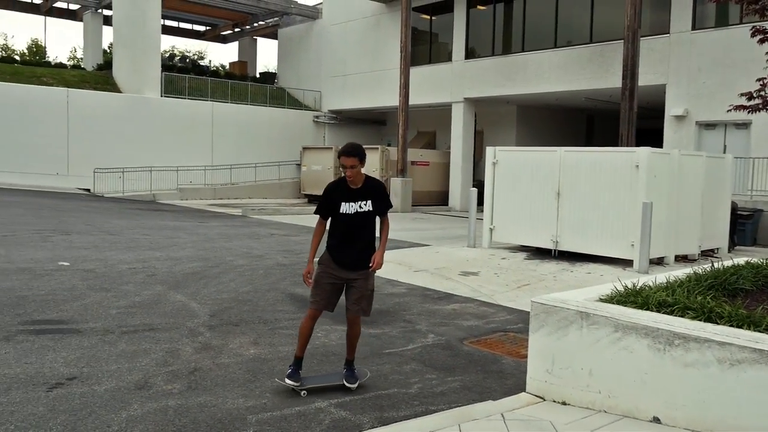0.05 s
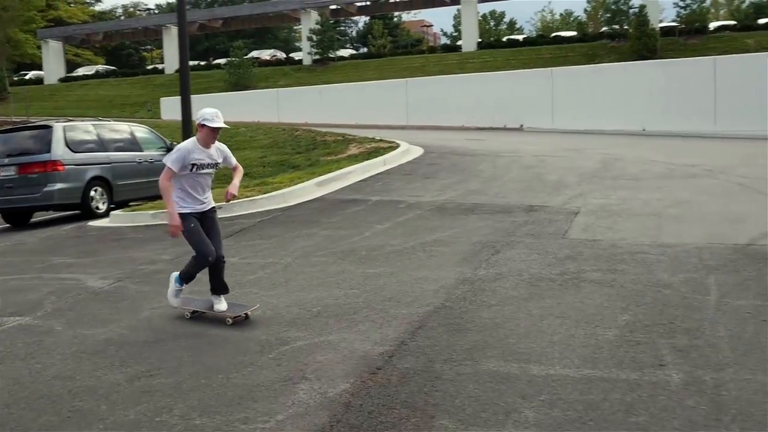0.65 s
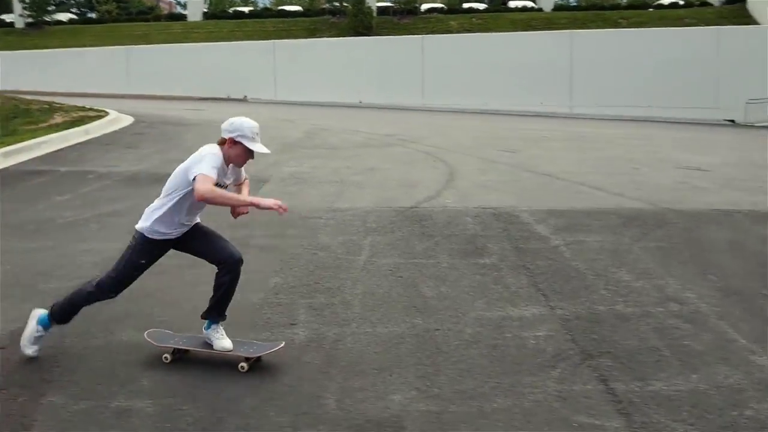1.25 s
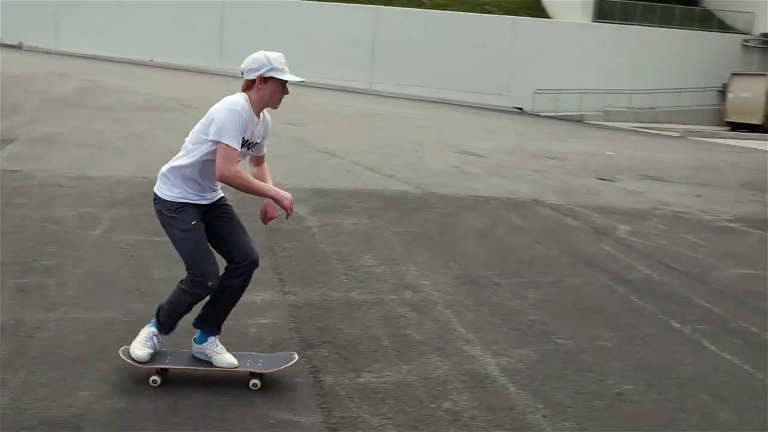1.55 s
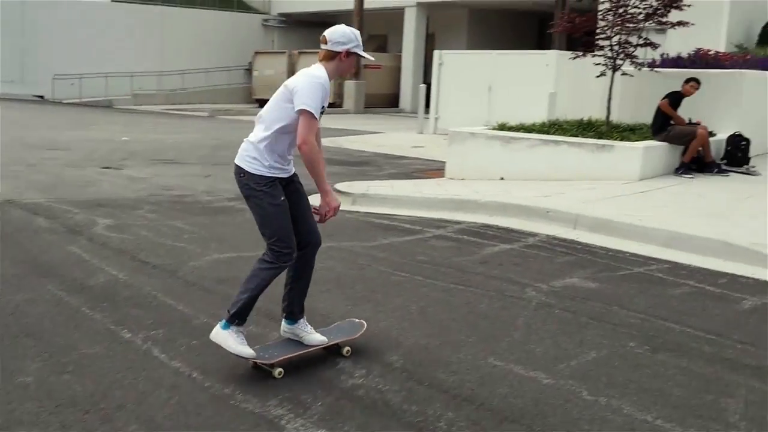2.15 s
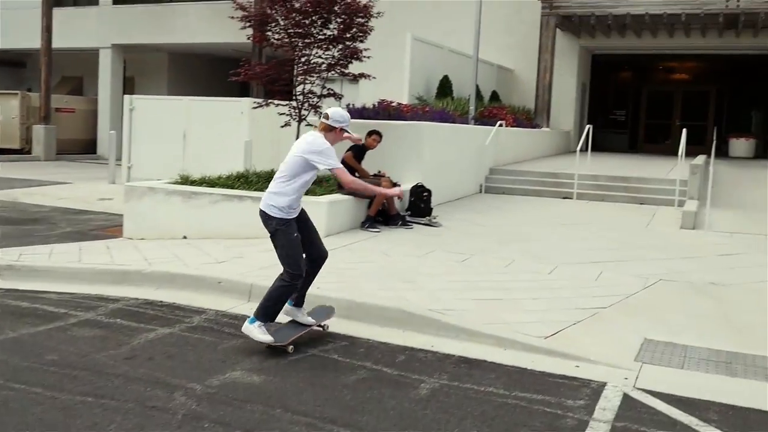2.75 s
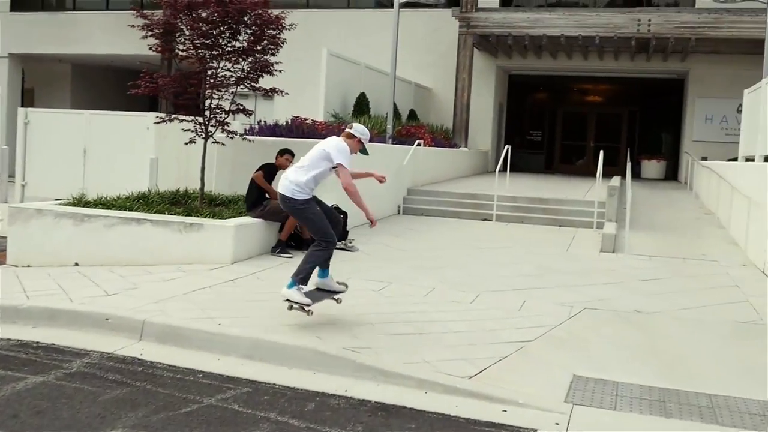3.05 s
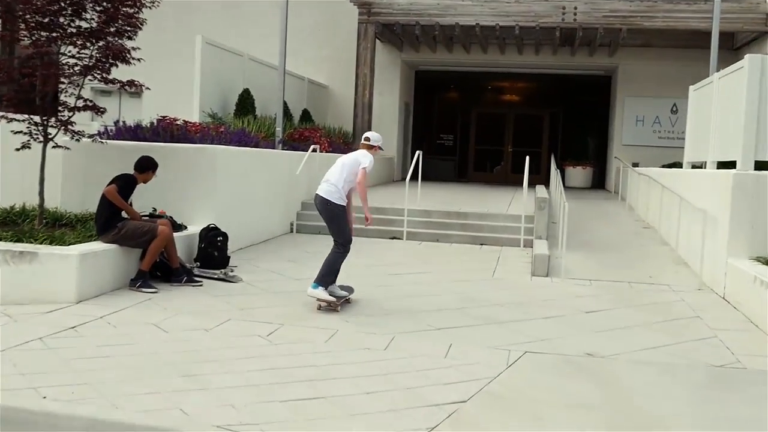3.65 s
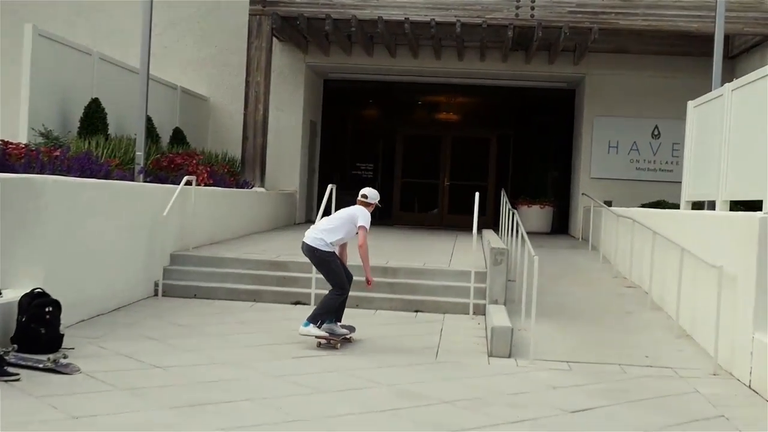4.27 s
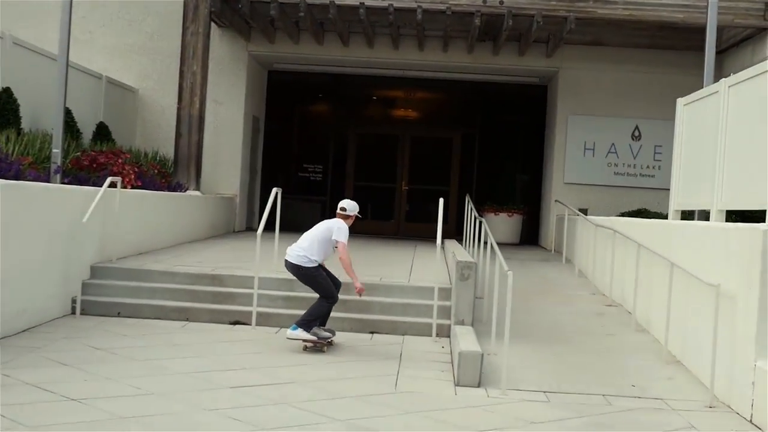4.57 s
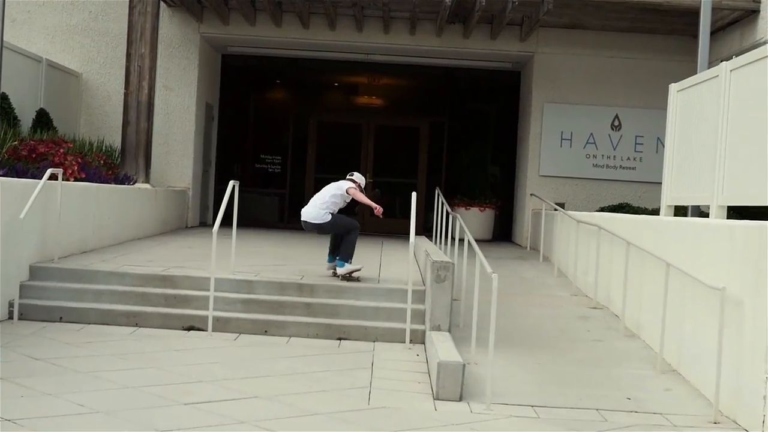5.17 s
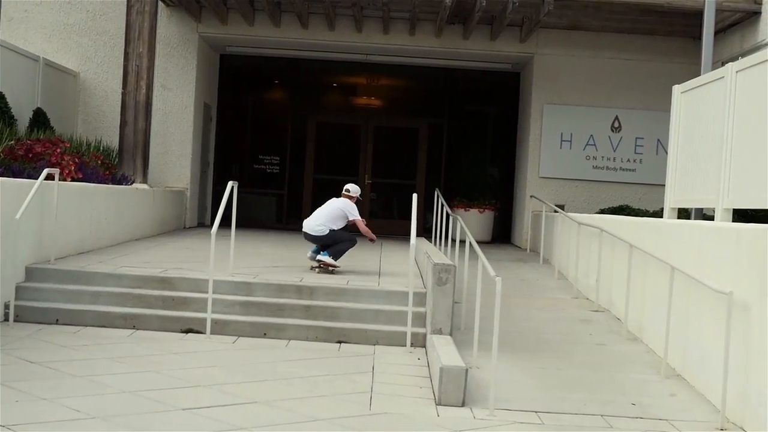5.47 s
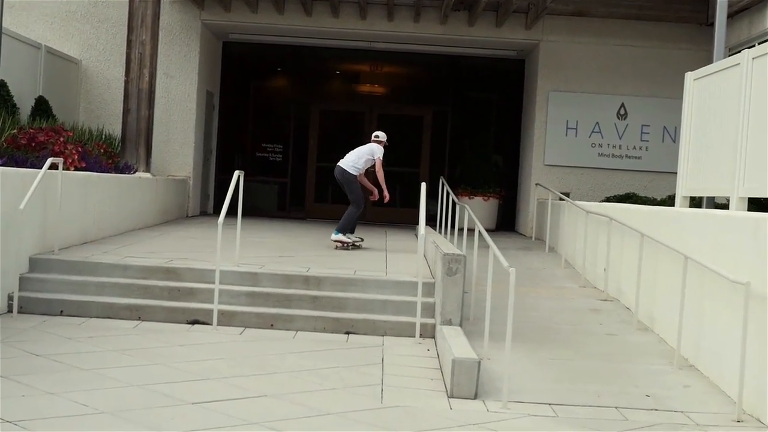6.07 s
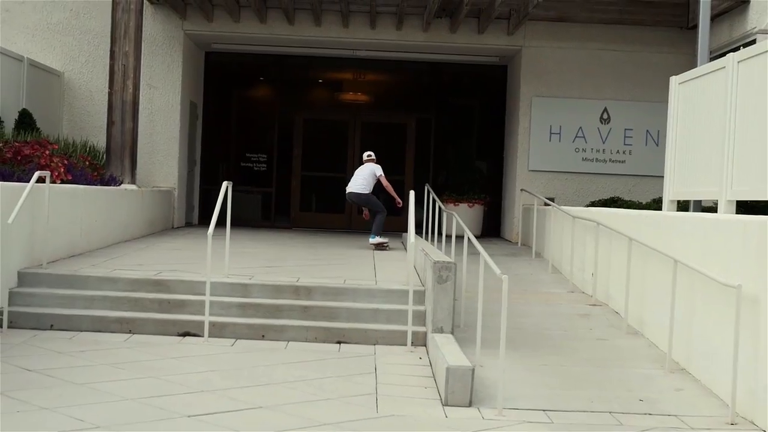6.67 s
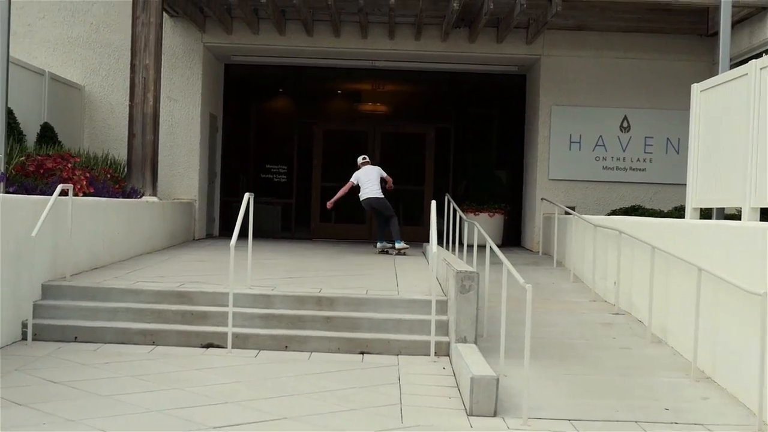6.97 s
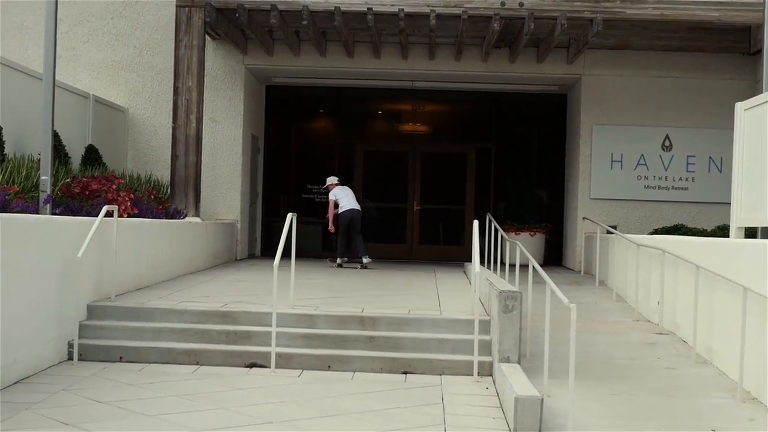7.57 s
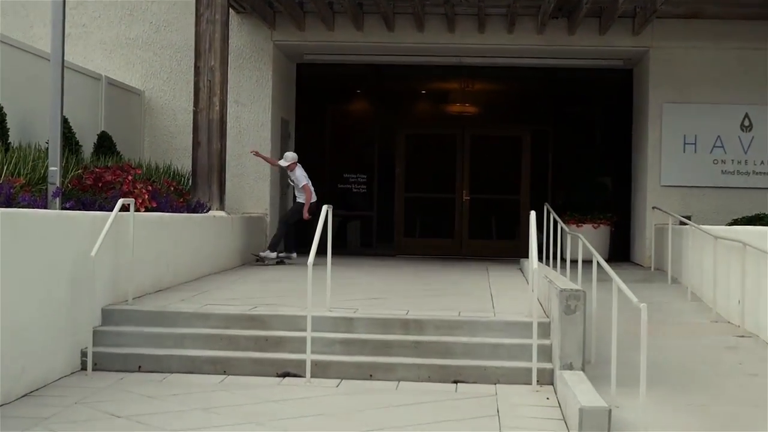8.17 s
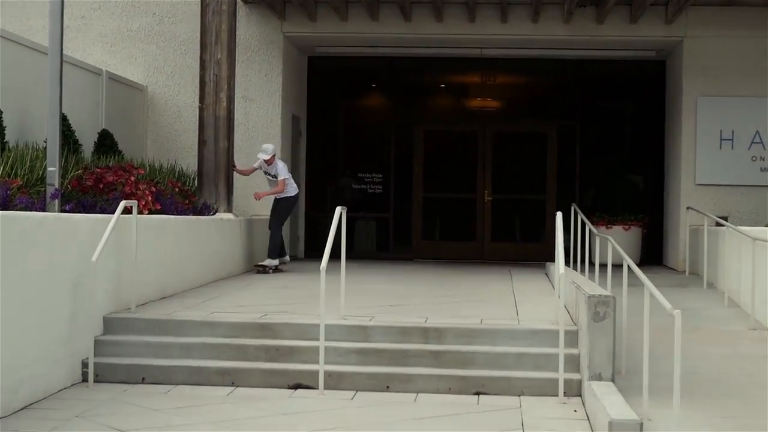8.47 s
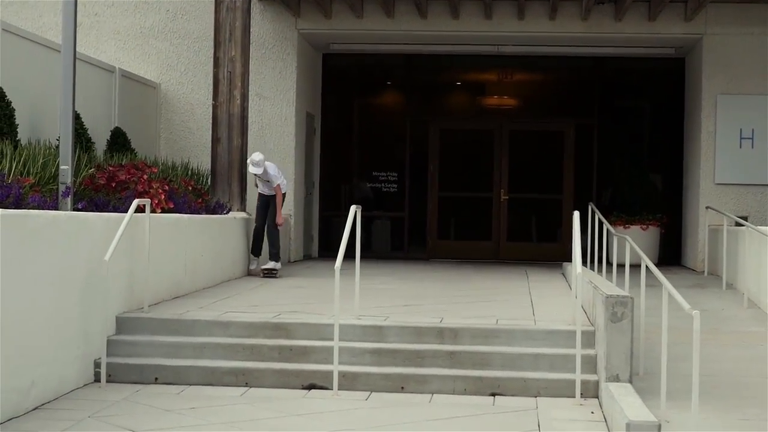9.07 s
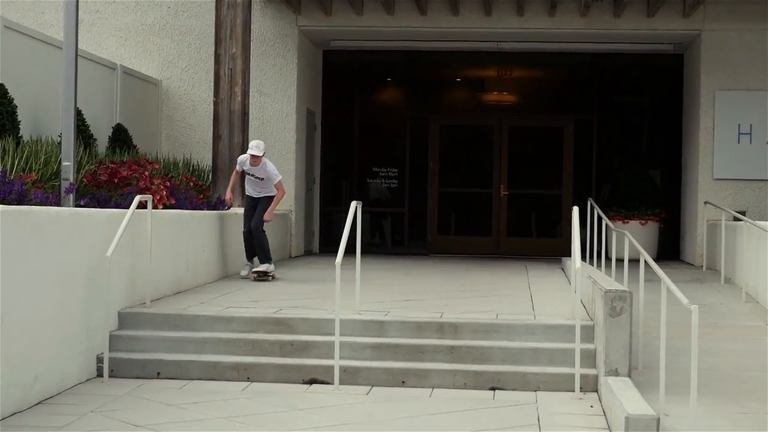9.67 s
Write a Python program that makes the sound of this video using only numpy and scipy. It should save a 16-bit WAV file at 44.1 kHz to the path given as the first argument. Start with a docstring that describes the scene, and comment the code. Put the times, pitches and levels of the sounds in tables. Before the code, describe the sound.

Skateboard wheels rumble over asphalt and paving, with two ollies popping and clacking down, then a slide and a juddering skid outdoors.

```python
"""A skateboard, almost still, knocks twice; a short silence follows. Over town noise and a building's hum,
the rider pushes across asphalt: stones ring his deck and crackle under his wheels, while a second board,
carrying the microphone, rumbles close by. He ollies up a curb (2.9 s), then a flight of steps (4.9 s);
building and risers echo the clacks, and the near board coasts to rest. He slides (7 s), skids round on
juddering, squeaking urethane (7.6 s) and clunks away over paving joints."""
import sys
import numpy as np
from scipy import signal
from scipy.fft import rfft, irfft
from scipy.io import wavfile

SR = 44100
rng = np.random.default_rng(int(sys.argv[2]) if len(sys.argv) > 2 else 0)


def dump(signal):
    """Clip the signal to [-1, 1] and save it as 16-bit WAV at the path in sys.argv[1]."""
    limited = np.clip(np.atleast_2d(signal).T, -1, 1)
    pcm = np.round(limited * 32767).astype(np.int16)
    wavfile.write(sys.argv[1], SR, pcm)


N = 437472
TIME_S = np.arange(N) / SR

# Spectra. Each row: frequency in Hz, density in dB.
TOWN_SPECTRUM = [(30, -46), (100, -7), (160, 1), (900, -1.5), (2000, -11.5), (3400, -23.5), (4500, -31),
                 (10000, -26), (15000, -41)]
GRIT_SPECTRUM = [(2000, -11.5), (3500, -10.5), (5200, -9.5), (6100, -6), (7900, -11.5), (8900, -2.5),
                 (10500, -1), (12000, -10), (16000, -28.5)]
THUD_SPECTRUM = [(30, -35), (150, -16.5), (600, 2), (1300, -2), (5000, -80)]
BOOM_SPECTRUM = [(30, -50), (105, -16), (160, -5), (230, -0.5), (325, 0), (420, -3.5), (650, -7.5),
                 (2000, -55)]
ROLLING_SPECTRUM = [(400, -44), (700, 4), (1080, 1), (1270, 3.5), (1620, -6), (1770, -6.5), (2700, -14.5),
                    (3250, -13), (8000, -37)]
# Resonances. Each row: frequency in Hz, bandwidth in Hz, gain in dB.
CLUNK_MODES = [(325, 80, 9.5), (700, 160, 6.5), (1270, 240, 2), (2100, 1370, -6.5)]
STEP_MODES = [(1780, 400, -16.5), (2370, 200, -16)]
DECK_MODES = [(294, 62, 2), (657, 290, 1.5), (1280, 150, 10), (1560, 140, -4), (1760, 130, 5),
              (2180, 170, -2.5), (2540, 170, -5), (3210, 240, -8.5), (3830, 220, -12), (5170, 2600, -19.5)]
WHEEL_MODES = [(466, 90, -2), (604, 59.4, 3), (790, 172, -3)]
SLIDE_MODES = [(470, 52, 5), (804, 72, 5), (1275, 122, 1.5), (1850, 1400, -12)]
SKID_MODES = [(268, 38, -4), (328, 55, 2), (495, 110, -6), (635, 140, -8), (1240, 320, -16.5),
              (2100, 1400, -28)]

# Air on the microphone ports. Each row: time in seconds, level in dB.
BREEZE_LEVELS = [(0.6, -44.5), (2.2, -35.5), (3, -53), (6.5, -55), (7.8, -46), (9.6, -40.5)]
# Joints and pebbles. Each row: start in seconds, clunk level in dB, tick level in dB.
JOINTS = [(0.049, -20, -30.5), (1.6825, -9, -16), (4.4338, -18.5, -24.5), (5.537, -16.5, -27),
          (5.65, -14.5, -26), (6.268, -20.5, -35), (6.464, -22.5, -30), (6.5593, -18, -31.5),
          (6.7506, -17, -27.5), (6.885, -13, -28), (8.0484, -16.5, -25.5), (8.2275, -14.5, -26),
          (8.3748, -17, -22), (8.8562, -16, -28), (9.112, -19.5, -22), (9.3217, -17, -28),
          (9.4967, -16.5, -26), (9.6743, -19, -26.5), (9.8271, -16.5, -27.5)]
# The building draws nearer. Each row: time in seconds, echo delay in ms.
ECHO_DELAYS = [(2.9, 118), (4.87, 62), (7, 42)]
# Soft wheel knocks in cracks. Each row: start in seconds, level in dB.
THUDS = [(0.061, -18.5), (0.596, 4), (1.683, -1), (1.959, 5), (2.734, 0.5), (3.255, 0), (3.353, -2),
         (4.787, -1.5), (7.769, -5), (8.854, -15)]
# Further blows on the deck: a tail tap, rattles around the landings, and the front and rear wheels crossing a
# joint (3.43 s, 3.52 s). Each row: start in seconds, level in dB, crack level in dB, contact in seconds, tilt
# in dB per octave.
DECK_HITS = [(0.2, -9, -60, 0.0034, 3.5), (3.229, -8, -35, .022, -1.5), (3.428, -0.5, -22.5, 0.0023, -1),
             (3.516, -1.5, -28, 0.0023, -1), (5.287, -12, -36, .025, -4)]
# The near board is pushed, then slows. Each row: time in seconds, rumble level in dB.
NEAR_LEVELS = [(0.53, -26.5), (0.8, -28), (1.13, -24), (1.37, -13), (1.45, -19.5), (1.7, -14.5),
               (1.82, -17), (1.94, -11.5), (2.12, -8.3), (2.23, -12), (3.4, -15.5), (4.35, -18),
               (4.67, -16.5), (4.85, -21.5), (5.07, -29)]
# Wheel roar. Each row: time in seconds, centre in Hz, share of the rumble in dB.
ROAR_PACE = [(1.6, 550, -1.34), (2.1, 620, -0.5), (3.7, 484.7, -2), (4.75, 528, -1.5), (5.9, 400.6, -2.5),
             (7.2, 572, -3.5)]
# The rider passes and rides off. Each row: time in seconds, distance in metres.
RIDER_DISTANCES = [(0.53, 8.7), (1.2, 4.2), (1.78, 2.48), (2.2, 3.4), (2.9, 4.16), (3.55, 6.8), (6.4, 10.8)]
# He nearly stalls after the slide and at the wall. Each row: time in seconds, speed in m/s.
RIDER_SPEEDS = [(0.53, 3.9), (1.8, 4.97), (5.6, 3.6), (6.4, 2.67), (7.33, 3.1), (7.52, 0.87), (7.75, 3.1),
                (8.25, 2.8), (8.7, 1.05), (9.05, 0.96), (9.4, 2.57)]
# He bears down to push, crouch or turn. Each row: centre in seconds, extra ring in dB, extra grit in dB.
PRESSES = [(1.17, 1.5, 3.5), (1.75, 1.5, 4.5), (2.74, 4.5, 1), (4.7, 2.5, 0), (6.78, 4.5, 4),
           (8.08, 8.5, 5)]
# Two near reflections. Each row: time in seconds, first delay in ms, second delay in ms.
REFLECTION_DELAYS = [(0.7, 0.93, 1.17), (1.55, 1.0, 1.22), (2.2, 0.94, 1.41), (2.9, 0.98, 1.58),
                     (4.8, 0.86, 1.61)]
# Ollies. Each row: tail pop in seconds, its level in dB, landing in seconds, its level in dB,
# second truck down in seconds, its level in dB, its crack level in dB.
OLLIES = [(2.909, 0.5, 3.181, 1, 3.194, 2.5, -18), (4.866, 2.5, 5.2515, 2.5, 5.316, 0, -32)]
# Ollie contacts. Each: crack relative to the hit in dB, contact in seconds, tilt in dB per octave.
POP = (-27, 0.0049, 1.4)
TOUCHDOWN = (-22, 0.0061, 0)
SHAKE = (-25, .028, -3)
# One wheel on a narrow joint or grain. Each row: start in seconds, level in dB.
TICKS = [(3.677, -21), (3.7065, -23), (3.9028, -14), (4.0312, -15.5), (4.158, -13.5), (4.225, -15.5),
         (4.365, -19), (4.552, -14.5), (5.0583, -21), (5.4627, -21), (5.804, -20), (6.0297, -22),
         (6.0962, -17.5), (7.349, -13), (8.161, -19.5)]
# Bushing and wheel squeaks. Each row: start and length in seconds, first and last pitch in Hz, level in dB.
SQUEAKS = [(5.19, .07, 2980, 2560, -41), (7.655, .07, 3480, 3680, -32), (7.675, .09, 2340, 2560, -32),
           (8.05, .115, 648, 638, -22)]
# Sideways scrapes. Each: start, attack, hold and release in seconds, ring, hiss and hiss swell in dB.
SLIDE_STROKE = (7.0, .062, .168, .055, -19.6, -27.2, 5)
SKID_STROKE = (7.645, 0.0369, .1, 0.1453, -12, -29, -3.5)

SILENCE_START_S, SILENCE_END_S = .278, .53
TERRACE_S = OLLIES[-1][2]  # he lands above the steps


def from_db(db):
    """Decibels to gain."""
    return 10 ** (np.asarray(db) / 20)


def unit_rms(x):
    """Scale to unit rms."""
    return x / np.sqrt(np.mean(x ** 2) + 1e-20)


def curves(rows):
    """One linearly interpolated curve per value column."""
    times_s, *columns = np.transpose(rows)
    return [np.interp(TIME_S, times_s, column) for column in columns]


def drift(rate_hz):
    """Slow random curve of unit rms."""
    knots = rng.standard_normal(4096)
    return unit_rms(np.interp(TIME_S * rate_hz, np.arange(len(knots)), knots))


def colour(x, spectrum, size=4096):
    """Minimum-phase filter with the given spectrum."""
    hz, db = np.transpose(spectrum)
    bins_hz = np.maximum(np.arange(size // 2 + 1) * SR / size, 1)
    gains = from_db(np.interp(np.log(bins_hz), np.log(hz), db))
    cepstrum = irfft(np.log(gains))
    cepstrum[1:size // 2] *= 2
    cepstrum[size // 2 + 1:] = 0
    response = irfft(np.exp(rfft(cepstrum)))
    return signal.oaconvolve(np.atleast_2d(x), response[None], axes=1)[:, :x.shape[-1]]


def resonate(x, modes):
    """Parallel resonances of alternating sign."""
    out = 0
    for k, (hz, width_hz, db) in enumerate(modes):
        r = np.exp(-np.pi * width_hz / SR)
        poles = [1, -2 * r * np.cos(2 * np.pi * hz / SR), r * r]
        gain = (-1) ** k * from_db(db) * (1 - r * r) / 2
        out = out + gain * signal.lfilter([1, 0, -1], poles, x + 1e-18)
    return out


def butter(x, hz, kind, order=2):
    """Butterworth low- or high-pass."""
    return signal.sosfilt(signal.butter(order, hz, kind, fs=SR, output="sos"), x)


def widen(pair, side_db):
    """Mid and side to stereo."""
    return pair[0] + from_db(side_db) * pair[1] * np.array([[1], [-1]])


def noise(samples, side_db):
    """Stereo white noise."""
    return widen(rng.standard_normal((2, samples)), side_db)


def delayed(x, ms):
    """Moving delay on both channels."""
    return np.array([np.interp(TIME_S - ms / 1000, TIME_S, channel, left=0) for channel in x])


def add(track, start_s, sound):
    """Mix a short sound into the track."""
    start = round(start_s * SR)
    track[:, start:start + sound.shape[1]] += sound[:, :track.shape[1] - start]


def background(town_db=-33.5, hum_hz=228.8, hum_width_hz=19, hum_db=-38.5):
    """Distant town, the building's ventilation hum, air on the microphone ports."""
    town = unit_rms(colour(noise(N, side_db=-8), TOWN_SPECTRUM))
    hum = unit_rms(resonate(noise(N, side_db=-35.5), [(hum_hz, hum_width_hz, 0)]))
    breeze = butter(noise(N, side_db=-3.5), 153, "low", order=3)
    breeze = unit_rms(butter(breeze, 94, "high", order=4))
    breeze_db = curves(BREEZE_LEVELS)[0] + 3 * drift(14)
    return town * from_db(town_db) + hum * from_db(hum_db) + breeze * from_db(breeze_db)


def impact(modes, ring_db, crack_db, contact_s, rise_s, fall_s, rattle_db, rattle_s):
    """Wood, trucks and wheels land in a tight cluster of contacts; the hardware rattles on."""
    t = np.arange(SR // 5) / SR
    force = np.minimum(t / rise_s, 1) * np.exp(-np.maximum(t - contact_s, 0) / fall_s)
    rattle = from_db(rattle_db) * np.exp(-t / rattle_s)
    contacts = noise(len(t), side_db=-12.5)
    wood = from_db(ring_db) * unit_rms(resonate(contacts * (force + rattle), modes))
    crack = from_db(crack_db) * unit_rms(colour(contacts * (force + .5 * rattle), GRIT_SPECTRUM))
    return (wood + crack) * np.sqrt(np.mean(force ** 2))


def joint_clunk(level_db, tick_db, speed_m_s, plain_m_s=2.8, skew_s=.009, hollow_s=.038):
    """Two wheels drop in, each followed by a hollow knock; slower means duller, with a longer rattle."""
    out = np.zeros((2, SR // 4))
    slowness = min(plain_m_s / speed_m_s, np.sqrt(2))
    tilt_db_oct = -3 * np.log2(slowness)
    second_s = skew_s * slowness * rng.uniform(.5, 2)
    for start_s, db in ((0, 0), (second_s, -5)):
        modes = struck_modes(CLUNK_MODES, tilt_db_oct, spread_db=3)
        wheel = impact(modes, level_db + db, tick_db + db, contact_s=.003, rise_s=.0008, fall_s=.003,
                       rattle_db=-2.5 + 20 * np.log10(slowness), rattle_s=.03 * slowness)
        add(out, start_s, wheel)
        add(out, start_s + hollow_s, from_db(-1) * butter(wheel, 850, "low"))
    return out


def struck_modes(modes, tilt_db_oct, spread_db):
    """Tilt and scatter the mode gains: each spot rings in its own way."""
    return [(hz, width_hz, db + tilt_db_oct * np.log2(hz) + spread_db * rng.standard_normal())
            for hz, width_hz, db in modes]


def building_echo(x, t60_s=.24, tail_db=-16, echo_db=-15.5, smear_s=.014, lowpass_hz=3200):
    """A smeared echo, sooner and louder as the building nears, and a dull tail."""
    def convolve(sound, response):
        return signal.oaconvolve(sound, response / np.linalg.norm(response[0]), axes=1)[:, :N]

    echo_ms, = curves(ECHO_DELAYS)
    t = np.arange(SR) / SR
    smear = rng.standard_normal((2, SR)) * np.exp(-t / smear_s)
    tail = rng.standard_normal((2, SR)) * from_db(-60 * t / t60_s) * (t > .008)
    nearness = np.mean(echo_ms) / echo_ms
    echo = from_db(echo_db) * nearness * convolve(delayed(x, echo_ms), smear)
    return butter(echo + from_db(tail_db) * convolve(x, tail), lowpass_hz, "low")


def wheel_thuds(ring_hz=570, ring_s=.0025, shake_s=.011, trim_db=-1):
    """A soft wheel in a crack gives the deck a short knock and a shake."""
    out, t = np.zeros((2, N)), np.arange(SR // 10) / SR
    knock = .15 * np.sin(2 * np.pi * ring_hz * t) * np.exp(-t / ring_s)
    for start_s, level_db in THUDS:
        shake = .11 * rng.standard_normal(len(t)) * np.exp(-t / shake_s)
        thud = colour(knock + shake, THUD_SPECTRUM)
        add(out, start_s, thud / np.abs(thud).max() * from_db(level_db + trim_db))
    return out


def steps_echo(x, tread_ms=3.7):
    """While he is below them, four risers return each clack as a ringing flutter."""
    echo_ms, = curves(ECHO_DELAYS)
    below = x * (TIME_S < TERRACE_S)
    return resonate(sum(delayed(below, echo_ms + tread_ms * k) for k in range(4)), STEP_MODES)


def deck_hit(level_db, crack_rel_db, contact_s, tilt_db_oct):
    """One blow rings the whole deck."""
    modes = struck_modes(DECK_MODES, tilt_db_oct, spread_db=2)
    return impact(modes, level_db - 7, level_db + crack_rel_db + 4, contact_s,
                  rise_s=.0019, fall_s=.0041, rattle_db=-18.5, rattle_s=.068)


def clacks(shake_after_s=.028, shake_db=-12.5):
    """Ollies (tail pop, two trucks landing, a shake), further deck blows, joint clunks and wheel ticks."""
    out = np.zeros((2, N))
    for pop_s, pop_db, land_s, land_db, truck_s, truck_db, crack_db in OLLIES:
        add(out, pop_s, deck_hit(pop_db, *POP))
        add(out, land_s, deck_hit(land_db, *TOUCHDOWN))
        add(out, truck_s, deck_hit(truck_db, crack_db - truck_db, contact_s=.0092, tilt_db_oct=-1.5))
        add(out, truck_s + shake_after_s, deck_hit(truck_db + shake_db, *SHAKE))
    for start_s, level_db, crack_db, contact_s, tilt_db_oct in DECK_HITS:
        add(out, start_s, deck_hit(level_db, crack_db - level_db, contact_s, tilt_db_oct))
    for start_s, level_db, tick_db in JOINTS:
        speed_m_s = np.interp(start_s, *np.transpose(RIDER_SPEEDS))
        add(out, start_s, joint_clunk(level_db, tick_db, speed_m_s))
    return butter(out + wheel_ticks(), 140, "high")


def road(stones_per_s, spread_db, sand_db, side_db):
    """Uneven stones strike the wheels, over the smooth noise of fine sand."""
    sizes = from_db(spread_db * np.minimum(rng.exponential(1, N), 4)) * rng.choice([-1, 1], N)
    stones = unit_rms(sizes * (rng.random(N) < stones_per_s / SR))
    sand = rng.standard_normal((2, N))
    return widen([unit_rms(stones + from_db(sand_db) * sand[0]), sand[1]], side_db)


def rumble_level_db(ring_db, coast_db_per_s=9, terrace_db=-19.5):
    """The near board until it coasts to rest, plus the rider's once on the terrace."""
    coasting_s = np.maximum(TIME_S - NEAR_LEVELS[-1][0], 0)
    near = from_db(curves(NEAR_LEVELS)[0] - coast_db_per_s * coasting_s)
    terrace = (TIME_S > TERRACE_S) * from_db(terrace_db + ring_db)
    return 20 * np.log10(np.hypot(near, terrace))


def rumble(level_db, base_roar_hz=600, shudder_db=1.6):
    """The deck booms and the wheels roar; faster rolling raises the roar's pitch."""
    centre_hz, share_db = curves(ROAR_PACE)
    share = from_db(share_db)
    boom = unit_rms(colour(road(500, spread_db=3.5, sand_db=-3, side_db=-35), BOOM_SPECTRUM))
    roar = resonate(road(900, spread_db=2.5, sand_db=-4, side_db=-29), WHEEL_MODES)
    roar = butter(butter(roar, 1020, "low", order=3), 210, "high")
    read_index = np.cumsum(centre_hz / base_roar_hz) % N
    roar = unit_rms(np.array([np.interp(read_index, np.arange(N), channel) for channel in roar]))
    return from_db(level_db + shudder_db * drift(28)) * (share * roar + np.sqrt(1 - share ** 2) * boom)


def rider_gains_db(press_s=.1, lift_db=3, spin_down_db_per_s=20, landing_db=2.5, recover_s=.34):
    """Ring and grit gains: speed over distance, raised by his weight, fading in the air."""
    (distance_m,), (speed_m_s,) = curves(RIDER_DISTANCES), curves(RIDER_SPEEDS)
    ring_db = grit_db = 20 * np.log10(speed_m_s / distance_m)
    for centre_s, extra_ring_db, extra_grit_db in PRESSES:
        weight = np.exp(-((TIME_S - centre_s) / press_s) ** 2)
        ring_db = ring_db + extra_ring_db * weight
        grit_db = grit_db + extra_grit_db * weight
    for pop_s, _, land_s, *_ in OLLIES:
        airborne = (TIME_S > pop_s) & (TIME_S < land_s)
        dip_db = airborne * (lift_db + spin_down_db_per_s * (TIME_S - pop_s))
        load_db = (TIME_S >= land_s) * landing_db * np.exp(-np.abs(TIME_S - land_s) / recover_s)
        ring_db = ring_db + load_db - dip_db
        grit_db = grit_db + load_db - 1.7 * dip_db
    return ring_db, grit_db


def rider_rolling(ring_db, grit_db, ring_base_db=-24.3, grit_base_db=-33.5, reflection_gain=.25):
    """Rough ground rings the deck and crackles; near reflections sweep a comb as he passes."""
    patches = from_db(2 * drift(90) - .35)
    deck = unit_rms(colour(road(1200, spread_db=3, sand_db=-1, side_db=-4.5), ROLLING_SPECTRUM))
    grit = unit_rms(colour(road(2000, spread_db=4.5, sand_db=-3, side_db=-7.5), GRIT_SPECTRUM))
    direct = (deck * from_db(ring_base_db + ring_db) + grit * from_db(grit_base_db + grit_db)) * patches
    return direct + reflection_gain * sum(delayed(direct, ms) for ms in curves(REFLECTION_DELAYS))


def loose_grit(grit_db, grains_per_s=22, base_db=-21, decay_s=.0015):
    """Single grains snap under the rider's wheels."""
    snaps = (rng.random(N) < grains_per_s / SR) * rng.random(N)
    bursts = signal.lfilter([1], [1, -np.exp(-1 / (decay_s * SR))], snaps + 1e-18)
    return unit_rms(colour(rng.standard_normal(N), GRIT_SPECTRUM)) * bursts * from_db(base_db + grit_db)


def wheel_ticks(decay_s=.0019, wood_db=-2):
    """One wheel snaps over a narrow joint or grain; the deck rings briefly."""
    out, t = np.zeros((2, N)), np.arange(SR // 20) / SR
    for start_s, level_db in TICKS:
        contact = noise(len(t), side_db=-12) * np.exp(-t / decay_s)
        snap = unit_rms(colour(contact, GRIT_SPECTRUM))
        wood = from_db(wood_db) * unit_rms(resonate(contact, DECK_MODES))
        add(out, start_s, (snap + wood) / np.abs(snap).max() * from_db(level_db))
    return out


def squeaks(waver=.0121):
    """Rubbing urethane catches on one wavering note."""
    out = np.zeros(N)
    for start_s, length_s, first_hz, last_hz, level_db in SQUEAKS:
        progress = np.clip((TIME_S - start_s) / length_s, 0, 1)
        hz = (first_hz + (last_hz - first_hz) * progress) * (1 + waver * drift(200))
        out += from_db(level_db) * np.sin(np.pi * progress) * np.sin(2 * np.pi * np.cumsum(hz) / SR)
    return out


def scrape(stroke, modes, slips_per_s, throb_depth, throb_hz, pitch_wander):
    """Urethane sticks and slips in uneven throbs, ringing the board and grinding grit."""
    start_s, attack_s, hold_s, release_s, ring_db, hiss_db, swell_db = stroke
    held_s = TIME_S - start_s - attack_s
    envelope = np.clip(1 + held_s / attack_s, 0, 1) * np.exp(-np.maximum(held_s - hold_s, 0) / release_s)
    hiss_db = hiss_db + swell_db * np.clip(held_s / hold_s, 0, 1)
    rate_hz = throb_hz * (1 + .1595 * drift(25))
    throbs = 1 + throb_depth * np.sin(2 * np.pi * np.cumsum(rate_hz) / SR)
    ring = unit_rms(resonate(road(slips_per_s, spread_db=0, sand_db=-1, side_db=-12.5), modes))
    ring = delayed(ring, ms=1000 * pitch_wander * np.cumsum(drift(30)) / SR)
    hiss = unit_rms(colour(road(4000, spread_db=2, sand_db=1, side_db=-3), GRIT_SPECTRUM))
    return envelope * throbs * (ring * from_db(ring_db) + hiss * from_db(hiss_db))


def slide_and_skid():
    """A hissing slide, then a deep judder of wandering pitch in the turn."""
    slide = scrape(SLIDE_STROKE, SLIDE_MODES, 1700, throb_depth=.17, throb_hz=35.5, pitch_wander=0)
    skid = scrape(SKID_STROKE, SKID_MODES, 410, throb_depth=.26, throb_hz=43.75, pitch_wander=.05)
    return butter(slide + skid, 105, "high", order=4)


def scene():
    """Both boards and the background, the rider slightly left."""
    hits = clacks()
    moving = TIME_S > SILENCE_START_S
    ring_db, grit_db = rider_gains_db()
    wheels = rider_rolling(ring_db, grit_db) + loose_grit(grit_db) + squeaks()
    rider = (wheels * moving + hits + building_echo(hits) + steps_echo(hits)) * from_db([[.9], [-.9]])
    rumbling = rumble(rumble_level_db(ring_db)) * moving
    return rider + rumbling + slide_and_skid() + wheel_thuds() + background()


def record(dry):
    """A short silence, clipped peaks, a steep treble cut."""
    cutoff_hz = 15600
    audible = (TIME_S < SILENCE_START_S) | (TIME_S > SILENCE_END_S)
    clipped = np.clip(dry * audible, -1, 1)
    return signal.sosfilt(signal.ellip(10, .1, 70, cutoff_hz, fs=SR, output="sos"), clipped)


dry = scene()
out = record(dry)
dump(out)
```